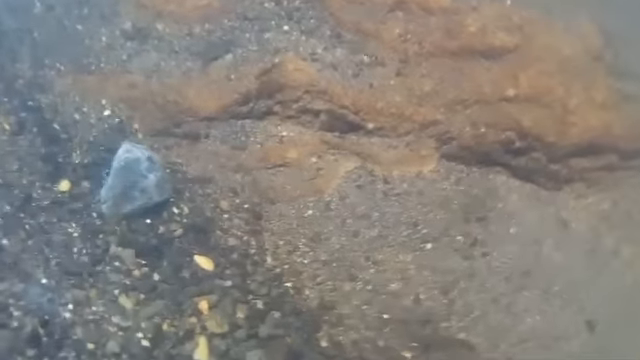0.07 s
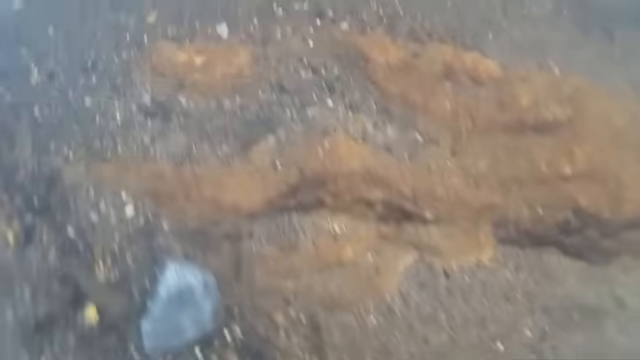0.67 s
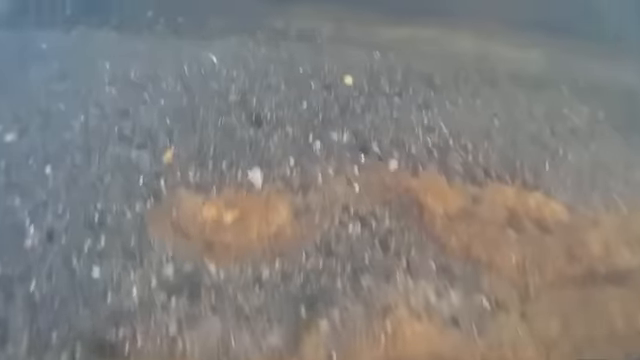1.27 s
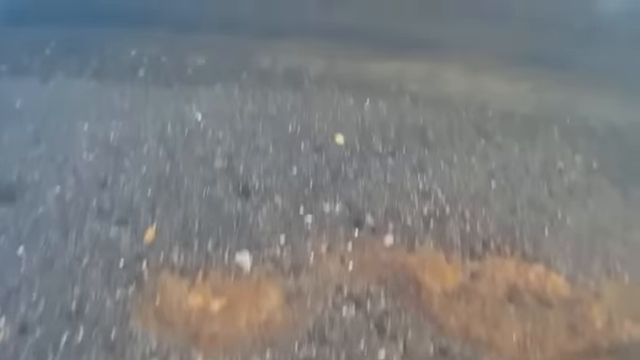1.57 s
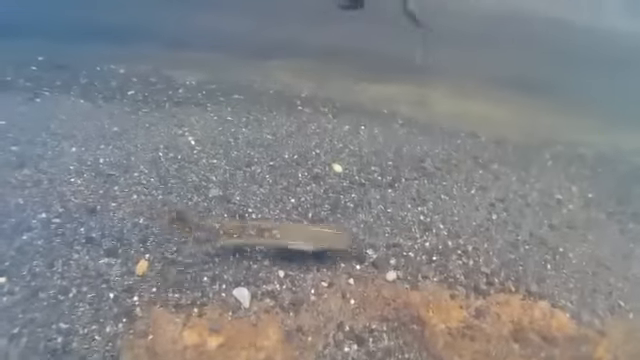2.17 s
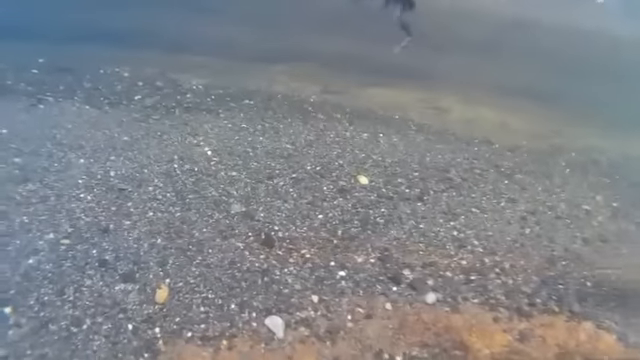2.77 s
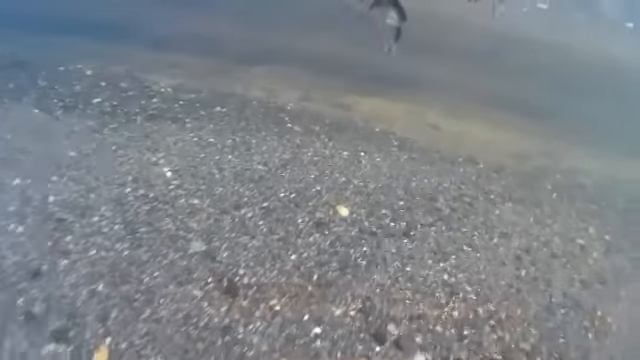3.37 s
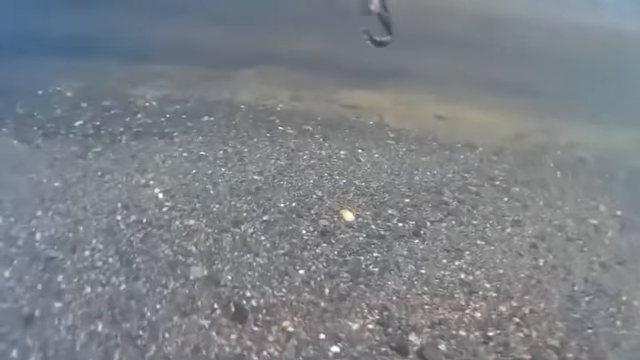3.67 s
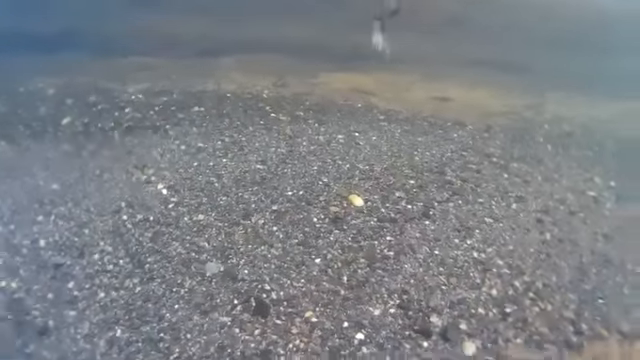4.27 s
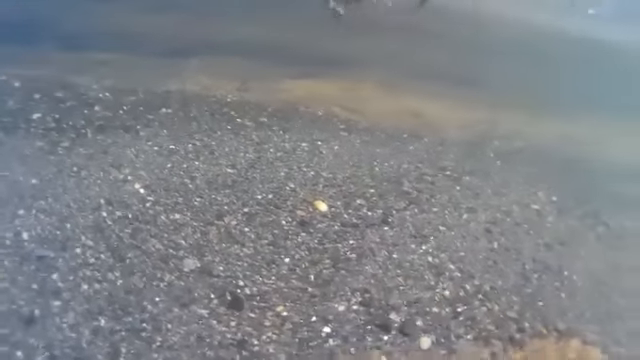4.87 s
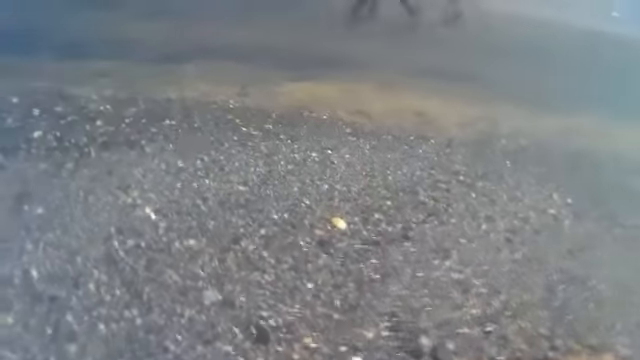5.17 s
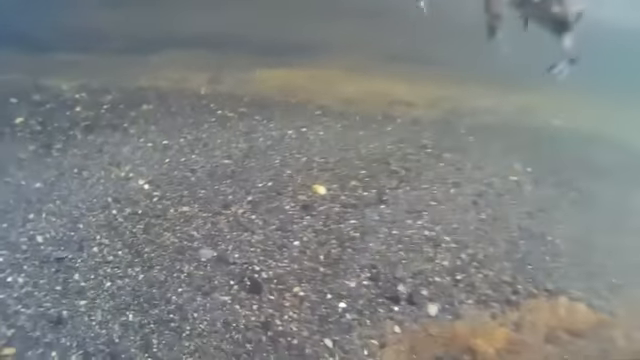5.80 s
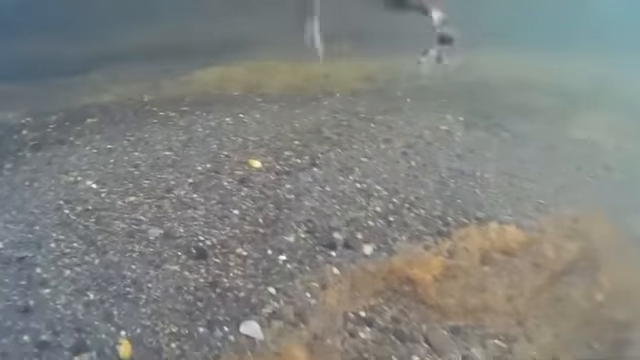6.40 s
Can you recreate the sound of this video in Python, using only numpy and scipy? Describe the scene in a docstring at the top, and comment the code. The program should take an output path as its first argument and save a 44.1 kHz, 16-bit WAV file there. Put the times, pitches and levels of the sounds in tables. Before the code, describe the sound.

Two frog-like croaks, the first faint and the second louder, sound over soft underwater rumble, followed by gritty ticks and a loud hollow knock.

```python
"""Water rumbles and washes over soft hiss, with a brief rubbing whirr and two ticks of grit: a shallow
stream, heard from inside a small waterproof case drifting over gravel under the surface.
Something croaks twice, like a frog: a faint quickening trill, then a louder run of separate pulses,
both coloured by quick echoes in the shallows. One bubble sounds between them.
Near the end more grit ticks on the case, and one hollow knock sets it ringing."""
import sys
import numpy as np
from scipy import signal
from scipy.fft import rfft, irfft
from scipy.io import wavfile
from scipy.ndimage import uniform_filter1d

SR = 44100
rng = np.random.default_rng(int(sys.argv[2]) if len(sys.argv) > 2 else 0)


def output_pcm(signal):
    """Save a mono or channel-first signal as 16-bit PCM at the path in sys.argv[1].

    Samples are clipped to [-1, 1] before scaling.
    """
    pcm = np.clip(np.atleast_2d(signal).T, -1, 1) * 32767
    wavfile.write(sys.argv[1], SR, np.round(pcm).astype(np.int16))


N = 288414
TIME = np.arange(N) / SR

# contours of the loud croak and the faint trill: time_s, pulses_per_s, level_db, pitch_hz
CROAK_CONTOUR = [(3.347, 32.09, -60.8, 820), (3.45, 17.08, -56.5, 820), (3.759, 27.19, -58.4, 719),
                 (3.843, 16.99, -53.1, 700), (3.928, 33.43, -51.4, 692), (4.061, 26.11, -48.6, 678),
                 (4.223, 34.51, -50.3, 663), (4.431, 29.84, -47.7, 668), (4.515, 40.24, -49.3, 669),
                 (5.02, 32.33, -63.3, 730)]
TRILL_CONTOUR = [(1.077, 26, -78, 660), (1.22, 27.5, -60, 680), (1.42, 38, -61, 715),
                 (1.62, 43.5, -59, 680), (1.85, 54, -62.5, 750), (2.02, 65, -59.5, 760),
                 (2.12, 71, -59, 780), (2.19, 75, -78, 760)]
# the knock and its rebounds: start_s, level_db, pitch_hz, swell_s
KNOCK_BLOWS = [(5.75686, -8.5, 830, .0042), (5.7598, -11, 658, .002), (5.7674, -14, 490, .002),
               (5.776, -23.5, 648, .002)]
# hard contacts on the case: ticks, a snap and the knock's sharp edges:
# start_s, level_db, centre_hz, width_octaves
CASE_CONTACTS = [(0.3405, -39, 7400, 0.2), (0.3895, -46.5, 5600, .15), (4.01, -44, 2500, 0.8),
                 (5.4450, -37, 1950, 0.3), (5.5599, -37.5, 2300, 3.0), (5.5622, -29, 3750, 0.11),
                 (5.6185, -41, 550, 1.4), (5.6392, -18, 5200, 0.75), (5.6402, -20.5, 800, 4.2),
                 (5.6418, -29, 5700, 0.5), (5.7428, -35.5, 5100, 2), (5.7599, -18, 1730, 1.1),
                 (5.7690, -38.5, 1500, 1.7), (5.776, -47, 3560, 0.88)]
# ringing modes of the case: pitch_hz, level_db, t60_s
CASE_MODES = [(511, -9, 0.053), (626, -8.5, 0.061), (755, -14, 0.062), (1587, -3, 0.018),
              (1940, -21, 0.014), (2440, -22, .014), (2880, -22, 0.014), (3710, -23, .014),
              (4280, -1, 0.0055), (5680, -6, .011), (7650, -17.5, 0.0088), (8200, -18, .008),
              (9120, -13, 0.0083)]
# resonances of the rubbing whirr: centre_hz, width_octaves, level_db
WHIRR_RESONANCES = [(1650, .2, .5), (800, .3, -6), (270, .6, -4)]
# strength of the flow past the case: time_s, level_db
FLOW_CONTOUR = [(0.0, -65), (0.87, -66), (0.98, -67), (2.33, -68), (2.79, -70), (3.2, -67), (3.79, -69),
                (4.63, -63), (5.17, -67), (5.66, -63), (6.38, -67), (6.54, -67)]
# swishes of water over the case, each with a low push: centre_s, swish_db, half_length_s, push_db
SWISH_SWELLS = [(0.148, -70, 0.09, -49.5), (0.372, -64, .035, -52), (0.65, -64.5, 0.06, -46.5),
                (2.17, -74, .08, -53), (3.005, -69.5, 0.036, -59), (3.32, -74, .08, -55),
                (4.48, -69, 0.086, -48), (4.95, -66, .03, -47.5), (5.36, -65, 0.094, -46),
                (5.735, -61.5, 0.036, -44), (5.827, -65, 0.045, -45)]
# tone colour of each water layer: frequency_hz, density_db
RUMBLE_SPECTRUM = [(10, -11.5), (20, 1.5), (28, 0), (40, -8), (60, -18.5), (100, -25.5), (200, -61.5)]
MURMUR_SPECTRUM = [(40, -6.5), (70, 1), (120, 1), (190, -1.5), (300, -5), (430, -13), (590, -9.5),
                   (800, -20.5), (2000, -38)]
WASH_SPECTRUM = [(40, -9.5), (70, 0), (110, -3.5), (200, -3.5), (320, -6.5), (430, -8), (590, -10.5),
                 (700, -12), (1600, -21), (3000, -25), (8000, -39)]
SWISH_SPECTRUM = [(150, -14), (350, -1.5), (800, 0), (1800, -7), (4000, -10.5), (9000, -20.5)]
HISS_SPECTRUM = [(200, -6.5), (700, 4), (1500, 3), (3000, 1), (5000, 0.5), (7000, -0.5), (8500, -3),
                 (10000, -9.5)]


def croak(hum_hz=592, hum_t60_s=0.14, hum_db=-55, gain_db=1):
    """Separate hollow pulses quicken unevenly as the croak swells, and leave the case humming briefly."""
    pulses = pulse_train(CROAK_CONTOUR, swell_s=.0014, uneven_db=.8, jitter_s=.0004, wobble=.016)
    flex = ring(pulses, hum_hz, hum_t60_s)
    hum = np.gradient(flex) * SR / (2 * np.pi * hum_hz)   # velocity: in step with the push
    return from_db(gain_db) * shallows(pulses + from_db(hum_db) * hum, first_db=-6.0, second_db=-18)


def faint_trill():
    """Pulses speed up and rise in pitch until they nearly merge."""
    pulses = pulse_train(TRILL_CONTOUR, swell_s=.0019, uneven_db=1.0, jitter_s=.00045, wobble=.015)
    return shallows(pulses, first_db=-5.5, second_db=-12)


def pulse_train(contour, swell_s, uneven_db, jitter_s, wobble):
    """One soft pulse per cycle of the rate, each a little off in time, strength and pitch."""
    per_s, level_db, hz = in_time(contour)
    calling = (TIME > contour[0][0]) & (TIME < contour[-1][0])
    cycles = np.cumsum(per_s * calling) / SR
    fired = np.flatnonzero(np.diff(np.floor(cycles)))
    pulses = []
    for i, (late, loud, sharp) in zip(fired, rng.standard_normal((200, 3))):
        start_s = TIME[i] - swell_s + jitter_s * late
        pulses.append(burst(start_s, level_db[i] + uneven_db * loud, hz[i] * (1 + wobble * sharp), swell_s))
    return lay_out(pulses)


def shallows(x, first_db, second_db, echo_s=.0051, passband_hz=(480, 1000)):
    """Shallow water passes one band; two quick echoes split each pulse into parts near 600 and 800 Hz."""
    x = signal.sosfilt(signal.butter(3, passband_hz, "band", fs=SR, output="sos"), x)
    once, twice = (np.interp(TIME - k * echo_s, TIME, x, left=0) for k in (1, 2))
    return x + from_db(first_db) * once + from_db(second_db) * twice


def knock(ring_db=-52, crunch_db=-36.5, crunch_hz=2150):
    """A blunt blow rebounds three times; the case rings on and the contact crunches faintly."""
    blow = lay_out(burst(*row) for row in KNOCK_BLOWS)
    tail = sum(from_db(db) * ring(blow, hz, t60_s) for hz, db, t60_s in CASE_MODES)
    contact = np.abs(signal.hilbert(blow))
    crunch = unit_rms(band(rng.standard_normal(N), crunch_hz, octaves=1.0))
    return blow + from_db(ring_db) * tail + from_db(crunch_db) * contact * crunch


def hard_contacts(scuff_db=-32, scuff_s=0.0029, crack_db=-10):
    """Each contact rings the case with a hard click and a brief scuff, also heard as a dry crack."""
    age = TIME[:SR // 20]
    clicks, scuffs = [], []
    for start_s, db, hz, octaves in CASE_CONTACTS:
        start = round(start_s * SR)
        rub = rng.standard_normal(len(age)) * np.exp(-age / scuff_s)
        clicks.append((start, from_db(db) * band(signal.unit_impulse(len(age)), hz, octaves)))
        scuffs.append((start, from_db(db) * band(rub, hz, octaves)))
    scuff = lay_out(scuffs)
    push = lay_out(clicks) + from_db(scuff_db) * scuff
    ringing = sum((-1) ** k * from_db(db) * ring(push, hz, t60_s)   # modes alternate in polarity
                  for k, (hz, db, t60_s) in enumerate(CASE_MODES))
    return ringing + from_db(crack_db) * scuff


def bubble():
    """One small bubble gives a soft, round blip."""
    return lay_out([burst(start_s=3.019, peak_db=-58, hz=590, swell_s=.009)])


def whirr(start_s=-.04, attack_s=.11, end_s=.38, release_s=.21, level_db=-68.5):
    """Light friction on the case keeps a few broad resonances sounding: it swells, holds and lets go."""
    rise = np.clip((TIME - start_s) / attack_s, 0, 1)
    fall = np.clip((end_s - TIME) / release_s, 0, 1)
    rub = rng.standard_normal(N)
    body = sum(from_db(db) * unit_rms(band(rub, hz, octaves)) for hz, octaves, db in WHIRR_RESONANCES)
    return from_db(level_db) * rise * fall * body


def water(rumble_db=-56.5, wash_db=-66, hiss_db=-68.6, murmur_db=-69, churn_db=1.5):
    """Pressure rumble, churning wash and hiss ride the flow over a steady murmur; swishes push the case."""
    flow_db, = in_time(FLOW_CONTOUR)
    surge_db = flow_db - flow_db.mean()   # the rumble follows this most, the hiss least
    swishing = pushing = 0
    for centre_s, swish_db, half_length_s, push_db in SWISH_SWELLS:
        swell = np.exp(-.5 * ((TIME - centre_s) / half_length_s) ** 2)
        swishing += from_db(swish_db) * swell
        pushing += from_db(push_db) * swell
    rumble = np.hypot(from_db(rumble_db + 1.6 * surge_db), pushing) * noise(RUMBLE_SPECTRUM)
    murmur = from_db(murmur_db) * noise(MURMUR_SPECTRUM)
    wash = from_db(wash_db + 1.25 * surge_db + churn_db * drift(per_s=30)) * noise(WASH_SPECTRUM)
    swish = swishing * noise(SWISH_SPECTRUM)
    hiss = from_db(hiss_db + .25 * surge_db) * noise(HISS_SPECTRUM)
    return rumble + murmur + wash + swish + hiss


def burst(start_s, peak_db, hz, swell_s):
    """A soft push through a broad resonance: a few cycles swell and die; gives (start sample, wave)."""
    age = TIME[:SR // 10]
    swell = (age / swell_s * np.exp(1 - age / swell_s)) ** 2
    return round(start_s * SR), from_db(peak_db) * swell * np.sin(2 * np.pi * hz * age)


def ring(push, hz, t60_s):
    """One mode: a unit click sets a sine of height 1 ringing away."""
    decay = from_db(-60 / (t60_s * SR))
    turn = 2 * np.pi * hz / SR
    return signal.lfilter([0, np.sin(turn)], [1, -2 * decay * np.cos(turn), decay * decay], push + 1e-18)


def band(x, hz, octaves):
    """A gentle band-pass."""
    edges = np.clip(hz * 2 ** (np.array([-.5, .5]) * octaves), 10, SR / 2 - 10)
    return signal.sosfilt(signal.butter(2, edges, "band", fs=SR, output="sos"), x)


def noise(spectrum):
    """Coloured noise at unit rms."""
    hz, db = np.transpose(spectrum)
    bins_hz = np.maximum(np.arange(N // 2 + 1) * SR / N, 1)
    shape = from_db(np.interp(np.log(bins_hz), np.log(hz), db))
    return unit_rms(irfft(rfft(rng.standard_normal(N)) * shape, N))


def drift(per_s):
    """A random wander at unit rms."""
    knots = rng.standard_normal(2000)
    return unit_rms(np.interp(TIME * per_s, np.arange(len(knots)), knots))


def in_time(contour):
    """Each column of a contour, sample by sample."""
    time_s, *columns = np.transpose(contour)
    return [np.interp(TIME, time_s, column) for column in columns]


def lay_out(bursts):
    """Mix (start sample, wave) pairs on the timeline."""
    track = np.zeros(N)
    for start, wave in bursts:
        track[start:start + len(wave)] += wave[:N - start]
    return track


def from_db(db):
    """Decibels to gain."""
    return 10 ** (np.asarray(db) / 20)


def unit_rms(x):
    """Scale to unit rms."""
    return x / np.sqrt(np.mean(x ** 2) + 1e-20)


def scene():
    """Everything reaches the microphone through the case, so both sides are alike."""
    mono = water() + whirr() + faint_trill() + croak() + bubble() + hard_contacts() + knock()
    return np.array([mono, mono])


def record(dry):
    """The right side drops out for an instant in the knock; a steep low-pass takes off the top."""
    dropout_start_s, dropout_end_s, cutoff_hz = 5.7600, 5.7711, 9850
    muted = (TIME > dropout_start_s) & (TIME < dropout_end_s)
    dropout = uniform_filter1d(1.0 * muted, size=36)   # soften the edges
    stereo = np.array([dry[0], dry[1] * (1 - dropout)])
    return signal.sosfilt(signal.ellip(10, .1, 70, cutoff_hz, fs=SR, output="sos"), stereo)


dry = scene()
out = record(dry)
output_pcm(out)
```